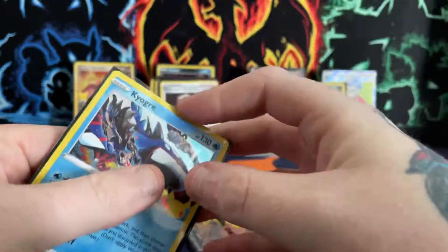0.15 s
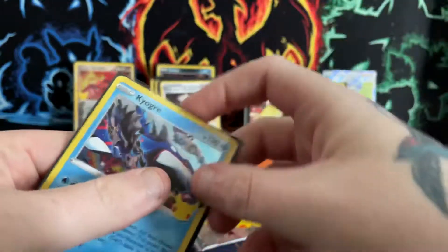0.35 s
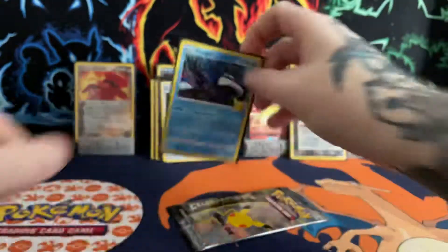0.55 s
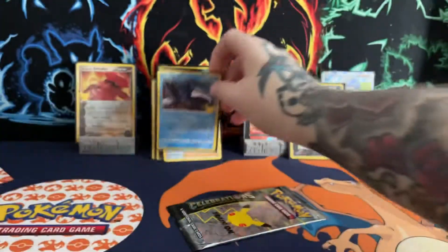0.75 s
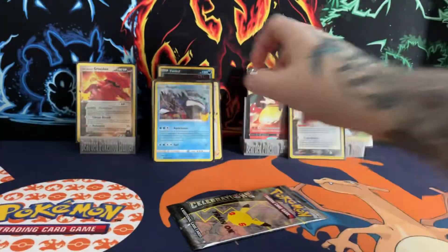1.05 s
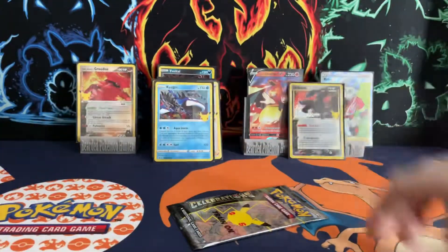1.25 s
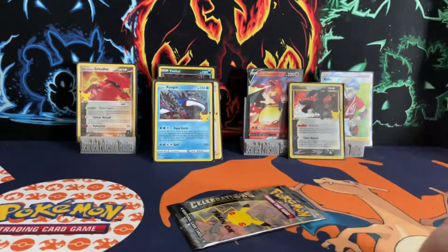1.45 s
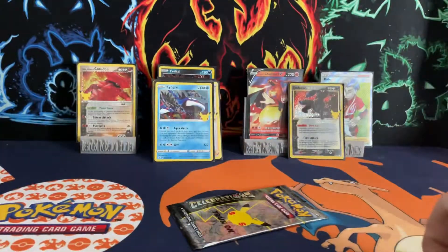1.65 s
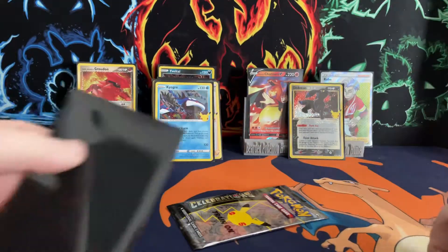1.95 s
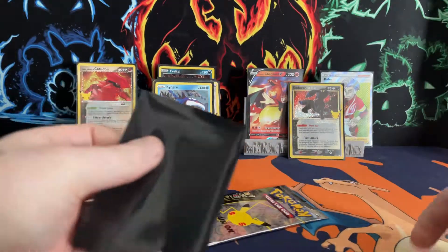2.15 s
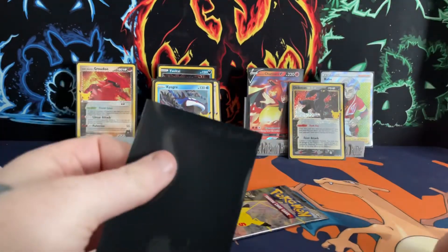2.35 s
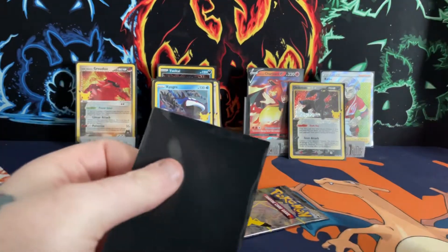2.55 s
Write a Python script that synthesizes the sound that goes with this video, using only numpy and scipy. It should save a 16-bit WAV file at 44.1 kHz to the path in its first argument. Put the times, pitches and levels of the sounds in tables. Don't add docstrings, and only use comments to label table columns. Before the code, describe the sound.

Hands sort cards and thin plastic sleeves on a cloth-covered table, ticking, scraping and dragging before a pile slaps down with a low thump; close stereo phone microphones, dry quiet room, faint room tone.

```python
import sys
import numpy as np
from scipy import signal
from scipy.fft import rfft, irfft
from scipy.io import wavfile
from scipy.ndimage import uniform_filter1d

SR = 44100
rng = np.random.default_rng(int(sys.argv[2]) if len(sys.argv) > 2 else 0)


def unload_audio(sound):
    columns = np.transpose(np.atleast_2d(sound))
    steps = np.round(np.clip(columns, -1, 1) * 32767)
    wavfile.write(sys.argv[1], SR, steps.astype(np.int16))


def gain_from_db(level_db):
    decades = np.asarray(level_db, float) / 20
    return 10 ** decades


N = 119070
SIZE = 32768
HZ = np.arange(1, SIZE // 2 + 2) * SR / SIZE
TOP_HZ = 13900
DULL = 1 / (1 + (HZ / TOP_HZ) ** 20)
TICK_ALIKE, RUB_ALIKE, TABLE_ALIKE, TREBLE_ALIKE = 0.51, 0.46, 0.74, 0.8
TREBLE_FROM_HZ, TREBLE_LATE_MS = 7000, 0.18
TICK_SKIRT_DB, FLICKER_DB = -21, 1.5


def unit(x):
    return x / np.sqrt(np.mean(x ** 2) + 1e-30)


def bell(hz, octaves, skirt_db):
    skirt = gain_from_db(skirt_db) * (HZ / 450) ** 2 / np.hypot(1, HZ / 450) ** 2.29
    peak = np.exp(-.5 * (np.log2(HZ / hz) / octaves) ** 2)
    return (peak + skirt) / np.hypot(1, (HZ / TOP_HZ) ** 10)


def resonant(peaks, between_db):
    return gain_from_db(between_db) + sum(gain_from_db(db) * np.exp(-.5 * (np.log2(HZ / hz) / octaves) ** 2)
                                 for hz, octaves, db in peaks)


def causal(gain):
    cepstrum = irfft(np.log(gain + 1e-6))
    cepstrum[1:SIZE // 2] *= 2
    cepstrum[SIZE // 2 + 1:] = 0
    return np.exp(rfft(cepstrum))


def snap(n):
    t = np.arange(SIZE)
    return np.exp(-np.maximum(t / n, .4) * 2.3) * (t < 6 * n)


def swell(n, edge):
    u = np.arange(SIZE) / n
    attack, release = u / edge, (1 - u) / (4.7 * edge) + 0.76
    return np.sin(np.pi / 2 * np.clip(np.minimum(attack, release), 0, 1)) ** 2


def stroke(n):
    return swell(n, 0.14)


# start_s, left_late_ms, left_minus_right_db
HANDS_AT = [
    (.55, 0.05, 4.5),
    (.7, -0.16, -0.5),
    (.97, -0.19, 3.5),
    (1.03, -0.42, 5),
    (1.7, -0.436, 3),
    (1.85, 0.11, 2.5),
]


def play(rows, shape, colour, alike, grain_db, peak=False, pan_db=None):
    out = np.zeros((2, N + SIZE))
    hands_s, hands_late_ms, hands_pan_db = np.array(HANDS_AT).T
    treble = HZ > TREBLE_FROM_HZ
    shared = np.where(treble, TREBLE_ALIKE, np.clip(alike, 0, 1))
    for start_s, level_db, hz, ms, octaves in rows:
        grains = rng.standard_normal((2, SIZE)) * gain_from_db(grain_db * rng.exponential(size=SIZE))
        flicker = uniform_filter1d(np.repeat(rng.standard_normal(SIZE // 512), 512), 256)
        n = max(ms * SR / 1000, 8)
        contact = grains * shape(n) * gain_from_db(FLICKER_DB * flicker)
        a, b = rfft(contact) * colour(hz, max(octaves, .03))
        if pan_db is None:
            late_ms = np.interp(start_s, hands_s, hands_late_ms)
            pan = np.interp(start_s, hands_s, hands_pan_db)
        else:
            late_ms, pan = 0, pan_db
        late_s = np.where(treble, TREBLE_LATE_MS, late_ms) / 1000
        delay = np.exp(-2j * np.pi * HZ * (np.array([late_s, -late_s]) / 2 + 1e-3))
        balance = gain_from_db(np.outer([.5, -.5], pan * ~treble))
        pair = irfft(np.array([a, shared * a + np.sqrt(1 - shared ** 2) * b]) * delay * balance)
        pair /= np.abs(pair).max() if peak else np.sqrt((pair ** 2).sum() / 2 / n)
        i = max(int((start_s - 1e-3) * SR), 0)
        out[:, i:i + SIZE] += pair * gain_from_db(level_db)
    return out[:, :N]


# start_s, peak_db, centre_hz, length_ms, spread_octaves
EDGE_SNAPS = [(.241, -54.5, 5240, 6.7, 0.2), (.3217, -31.5, 8050, 0.55, 0.71),
              (.3325, -38.5, 1700, 3.3, 0.87), (.3465, -30, 1340, 1.58, 1),
              (.3478, -27.5, 11000, 0.59, 0.36), (.3498, -24.5, 8800, 1.1, 0.41),
              (.3683, -35.5, 10300, 1.6, 0.42), (.466, -49.5, 6000, 4.8, 1.6),
              (.7535, -38.5, 1074, 2.2, 0.26), (.7935, -34, 1480, 3, 0.44), (.802, -33.5, 1470, 5.5, 0.72),
              (.941, -45, 1330, 3.8, 0.38), (1.038, -42, 1860, 5.4, 1.2),
              (1.066, -24, 2460, 0.81, 0.88),
    (1.067, -25, 2560, 2.84, 0.65),
    (1.2161, -31.5, 4920, 4, .15),
    (1.2163, -33.5, 1720, 0.94, 1),
    (1.2257, -29, 1480, 4, 0.62),
    (1.508, -34.5, 3900, 9.7, 0.43),
    (1.519, -40, 764, 12, 0.47),
    (1.77, -47.5, 700, 5.3, 0.52),
]
PILE_SNAPS = [
    (1.9215, -23.5, 3700, 4, 0.94),
    (1.978, -17.5, 4500, 1.2, 0.97),
    (1.9812, -11.5, 3200, 2.28, 1),
    (1.9825, -23.5, 977, 3.93, 0.51),
    (1.9905, -19, 4000, 0.86, .5),
    (2.29, -56, 4800, 1.7, 0.37),
    (2.449, -50.5, 700, 17, 0.6),
    (2.641, -55, 6000, 3.9, 0.77),
]
# centre_hz, spread_octaves, level_db
PILE_MODES = [(865, 0.085, 0), (2050, 0.1, 0.5), (3464, 0.044, -1.5), (4135, 0.092, 1), (5150, 0.013, -11),
              (6430, 0.042, 3.5), (9170, 0.075, -12)]


def ticks():
    pile, far = causal(resonant(PILE_MODES, -5)), causal(np.sqrt(DULL))

    def edge(hz, octaves):
        return causal(bell(hz, octaves, TICK_SKIRT_DB))

    single = play(EDGE_SNAPS, snap, lambda hz, o: edge(hz, o) * far, TICK_ALIKE, 0.67, peak=True)
    slap = play(PILE_SNAPS, snap, lambda hz, o: edge(hz, o) * pile, TICK_ALIKE, 1.0, peak=True)
    return single + slap


# start_s, level_db, centre_hz, length_ms, spread_octaves
SLEEVE_SCRAPES = [
    (1.068, -52.5, 2250, 14, 1),
    (1.098, -56, 2300, 30, 1.1),
    (1.124, -49, 3200, 34, 1.1),
    (1.168, -64.5, 3000, 37, 0.6),
    (1.204, -49, 4000, 9, 1.1),
    (1.213, -41.5, 4800, 5.1, 1.1),
    (1.2195, -40, 3300, 5.7, 1.2),
    (1.235, -54.5, 2500, 6.9, .9),
]
# centre_hz, spread_octaves, level_db
SLEEVE_MODES = [(1700, 0.11, 3), (2363, 0.055, 0), (4980, 0.039, -5.5), (6000, 0.049, -9),
                (10500, 0.067, -18)]
# start_s, peak_db, centre_hz, length_ms, spread_octaves
MORE_SNAPS = [
    (.329, -49, 6000, 1.7, 0.35),
    (.3455, -50, 6450, 1.2, .4),
    (.365, -37, 11000, 1.5, 0.36),
    (1.0863, -35.5, 2460, 3.3, 1),
    (1.1317, -52, 2550, 2.6, 0.65),
    (1.1385, -44, 2480, 1.6, 0.4),
    (1.932, -45, 4200, 2.7, 0.36),
    (2.008, -46, 3910, 3, .15),
    (2.196, -56, 1275, 4, 0.53),
    (2.65, -59.5, 1620, 15, 0.35),
]
# start_s, level_db, centre_hz, length_ms, spread_octaves
CLOTH_BRUSHES = [
    (.56, -74, 3210, 130, .08),
    (.665, -61.5, 3230, 94, .12),
    (1.37, -61.5, 1500, 40, .9),
    (1.045, -61, 7160, 27, 0.68),
    (1.25, -66, 580, 176, 0.88),
    (1.65, -61, 840, 142, 0.88),
    (1.8, -65, 670, 300, 1),
    (1.962, -59, 4000, 14, .8),
    (1.99, -66.5, 1610, 120, 0.13),
    (2.3, -73, 13500, 99, .1),
]


def sleeve():
    film = resonant(SLEEVE_MODES, -5) * DULL
    scrapes = play(SLEEVE_SCRAPES, stroke, lambda hz, o: bell(hz, o, -7.5) * film, TICK_ALIKE, 2.9)
    more_snaps = play(MORE_SNAPS, snap, lambda hz, o: causal(bell(hz, o, TICK_SKIRT_DB) * DULL),
                   TICK_ALIKE, 0.71, peak=True)
    brushes = play(CLOTH_BRUSHES, stroke, lambda hz, o: bell(hz, o, -23.5) * DULL, RUB_ALIKE, 1.5)
    return scrapes + more_snaps + brushes


def patches():
    steps = np.repeat(rng.standard_normal(SIZE // 256 + 1), 128)
    return gain_from_db(2.3 * unit(uniform_filter1d(steps, 256))[:len(HZ)]) * DULL


# start_s, level_db, centre_hz, length_ms, spread_octaves
RUB_STROKES = [(0, -69, 6000, 60, 1.7), (.24, -63.5, 4260, 138, 1.1), (.28, -62, 10500, 21, 0.1),
               (.325, -53.5, 6000, 16, 0.93), (.357, -49, 10800, 6.6, 0.17), (.4, -73.5, 8200, 200, 1.34),
               (.55, -70, 3000, 310, 1.03), (.65, -57.5, 2740, 143, 0.94), (.91, -65.5, 3810, 160, 1.46),
               (1.07, -57, 3240, 65, 1.34), (1.16, -57.5, 3000, 78, 1.34), (1.225, -62, 2240, 170, 1.1),
               (1.33, -56.5, 2830, 184, 1.14), (1.47, -62.5, 5070, 102, 1.1), (1.55, -59.5, 3620, 260, 1.5),
               (1.65, -56.5, 6000, 110, 1), (1.79, -56, 3860, 136, 1.12), (1.925, -66, 2814, 55, 0.84),
               (2.275, -64.5, 6150, 133, 1.58), (2.42, -63, 4690, 67.6, 1.03), (2.52, -74, 5560, 210, 0.45)]
# start_s, level_db, centre_hz, length_ms, spread_octaves
SINGING_DRAGS = [
    (.85, -64.5, 1240, 115, 0.17),
    (.93, -61.5, 1386, 37, 0.078),
    (1.245, -57, 1440, 110, .035),
    (1.585, -65, 1472, 145, .03),
    (1.72, -57.5, 1610, 44, 0.2),
    (1.83, -59.5, 1540, 160, 0.11),
    (2.06, -73.5, 1556, 170, 0.13),
    (2.36, -73.5, 1540, 178, 0.23),
]


def rubbing():
    strokes = play(RUB_STROKES, stroke, lambda hz, o: bell(hz, o, -7) * patches(), RUB_ALIKE, grain_db=1)
    drags = play(SINGING_DRAGS, stroke, lambda hz, o: bell(hz, o, -28) * DULL, RUB_ALIKE, grain_db=1.2)
    return strokes + drags


# start_s, level_db, push_hz, contact_ms,
# spread_octaves
TABLE_BUMPS = [(0, -61, 65, 26, 1.34), (.112, -52, 152, 13, 0.7), (.26, -63, 129.1, 150, 1.1),
               (.335, -48.5, 257, 20, 0.87), (.36, -54.5, 84, 30, 0.65), (.56, -48, 112, 79, 0.98),
               (.66, -52, 137, 174, 1.62), (.794, -37, 317, 15.1, 0.29), (.81, -46, 127, 28, 0.53),
               (.86, -57.5, 153, 62, 1.6), (.938, -52, 131, 65, 1.33), (1.07, -50.5, 189, 31, 1.05),
               (1.14, -53.5, 116, 51, 0.97), (1.222, -40.5, 185.2, 16, 1.5), (1.262, -42, 56.3, 45.1, 1),
               (1.36, -54, 89.7, 89, 2.3), (1.485, -52.5, 123, 59, 1.36), (1.58, -66, 72, 330, 1.74),
               (1.765, -54, 245, 12.4, 0.38), (1.8, -64.5, 105, 78, 1.3), (1.922, -47, 350, 11, 0.86),
               (1.93, -48, 113, 14, 0.48),
               (1.982, -40, 324, 9.5, 0.47),
    (1.99, -32.5, 145, 16.8, 0.63),
    (2.004, -50.5, 53.6, 41, 0.36),
    (2.102, -51.5, 310, 10.2, 0.409),
    (2.196, -49, 137, 33, 0.52),
    (2.238, -53.5, 54.2, 52, 0.65),
    (2.299, -60, 147, 510, 1.8),
    (2.543, -64.5, 140, 78, 0.17),
]
# mode_hz, level_db, t60_s
TABLE_MODES = [(57, 3.5, 0.21), (101.3, 2, 0.069), (140.5, 5.5, 0.19), (218, -10, 0.024), (287.4, -6, 0.28),
               (342.5, -7, 0.029), (422.3, -7, 0.2)]


def table():
    modes = 0
    for hz, db, t60_s in TABLE_MODES:
        decay = np.log(1000) / t60_s
        modes = modes + gain_from_db(db) * decay / (decay + 2j * np.pi * (HZ - hz))
    return play(TABLE_BUMPS, lambda n: swell(n, 0.069), lambda hz, o: modes * causal(bell(hz, o, -21)),
                TABLE_ALIKE, 0.63, pan_db=1.5)


def room(air):
    t60_s, gap_s, top_hz, level_db = 0.22, 0.0017, 6000, -16
    t = np.arange(SR // 2) / SR
    tail = rng.standard_normal((2, len(t))) * gain_from_db(-60 * t / t60_s) * (t > gap_s)
    tail = signal.lfilter(*signal.butter(1, top_hz, fs=SR), tail)
    tail /= np.sqrt((tail ** 2).sum() / 2)
    return gain_from_db(level_db) * signal.fftconvolve(air, tail, axes=1)[:, :N]


# tone_hz, density_db_per_hz
ROOM_TONE = [(30, -17), (90, -4.5), (450, -17), (550, -25.5), (2000, -32.5), (13000, -44.5), (14300, -90)]


def floor():
    hz = np.arange(1, N // 2 + 2) * SR / N
    tone_hz, tone_db = np.array(ROOM_TONE).T
    colour = gain_from_db(np.interp(np.log(hz), np.log(tone_hz), tone_db))
    mid, side = rfft(rng.standard_normal((2, N))) * colour
    width = np.clip(hz / 600, .3, 1)
    return gain_from_db(-71.5) * unit(irfft(mid + width * side * np.array([[1], [-1]]), N))


def scene():
    air = ticks() + sleeve() + rubbing()
    return air + room(air) + table() + floor()


def low_pass(x):
    return signal.sosfilt(signal.butter(12, 16480, fs=SR, output="sos"), x)


def record(dry):
    highpass = signal.butter(4, 36, "high", fs=SR, output="sos")
    mix = signal.sosfilt(highpass, dry)
    return low_pass(mix)


dry = scene()
out = record(dry)
unload_audio(out)
```